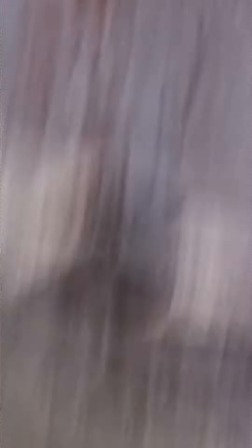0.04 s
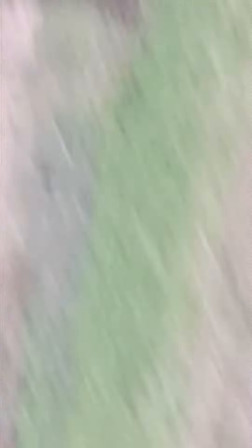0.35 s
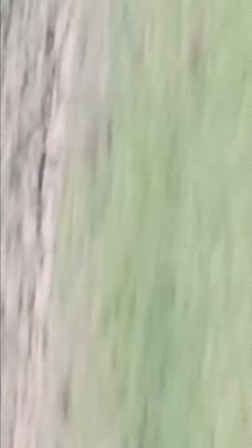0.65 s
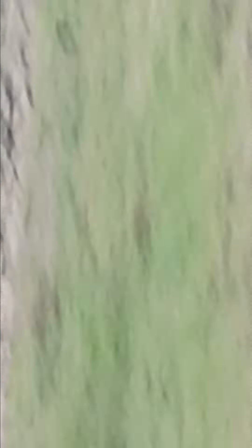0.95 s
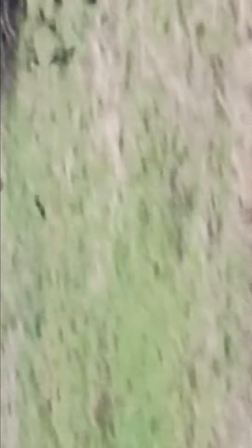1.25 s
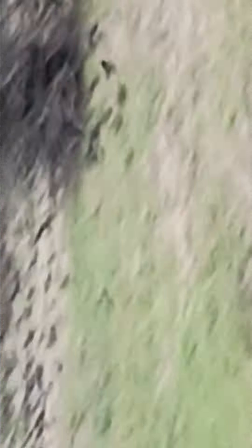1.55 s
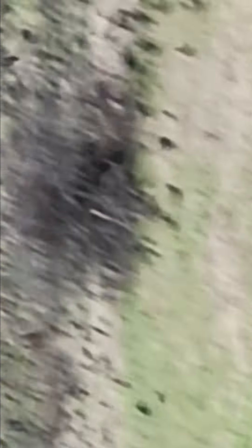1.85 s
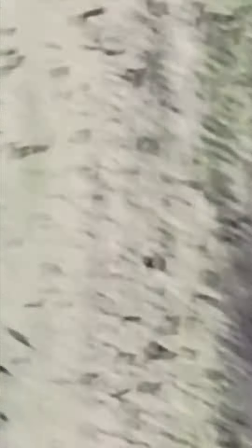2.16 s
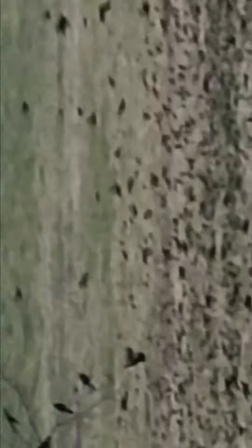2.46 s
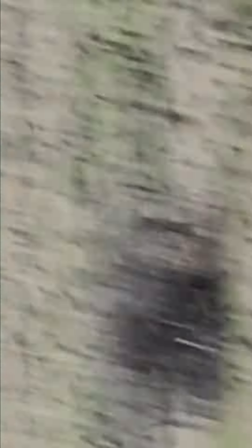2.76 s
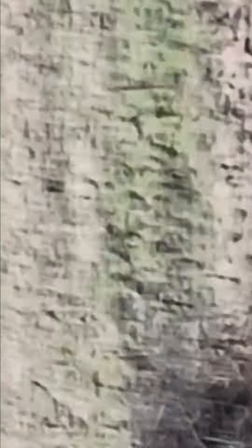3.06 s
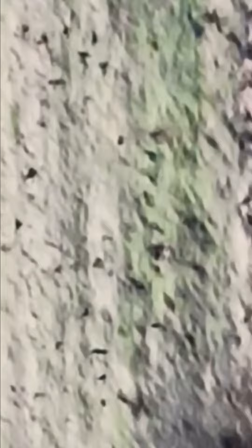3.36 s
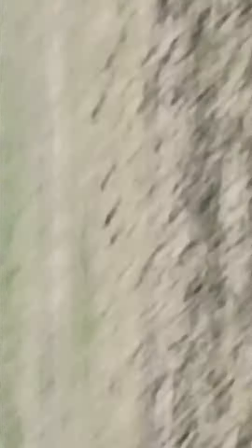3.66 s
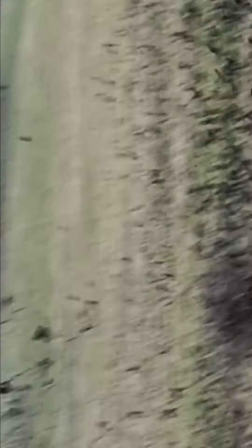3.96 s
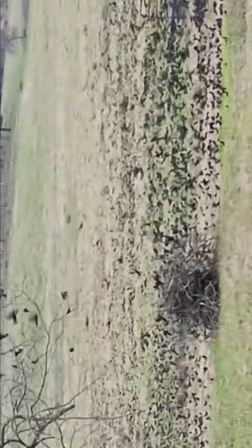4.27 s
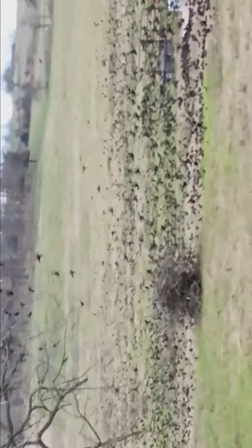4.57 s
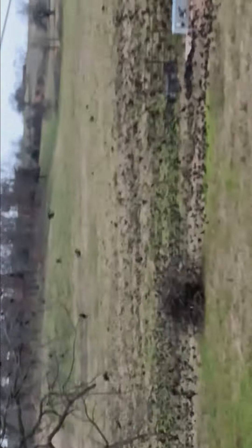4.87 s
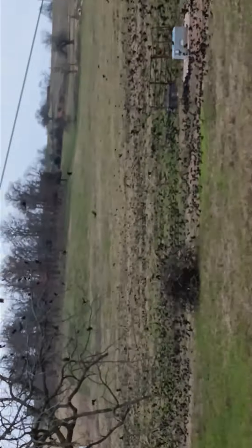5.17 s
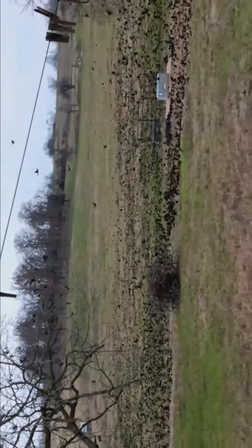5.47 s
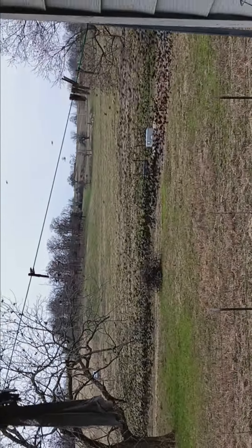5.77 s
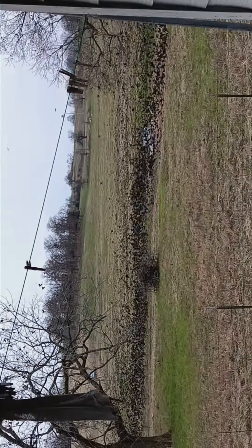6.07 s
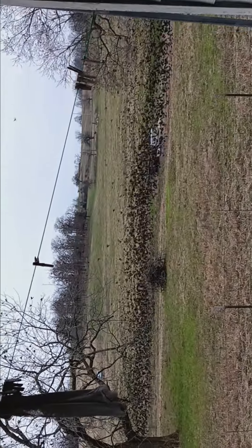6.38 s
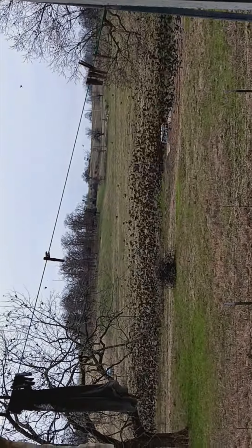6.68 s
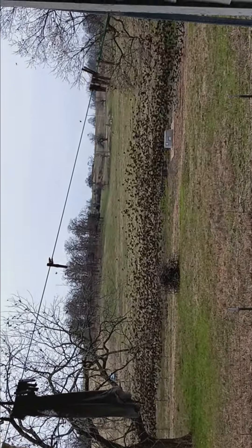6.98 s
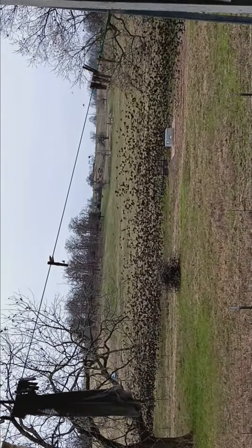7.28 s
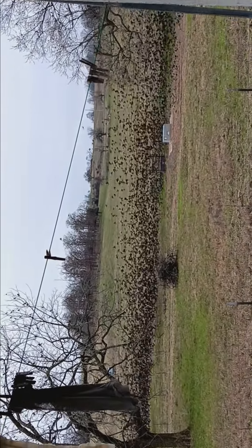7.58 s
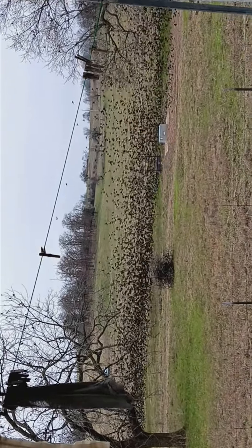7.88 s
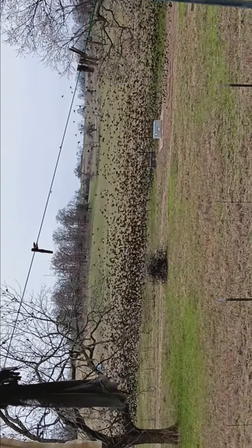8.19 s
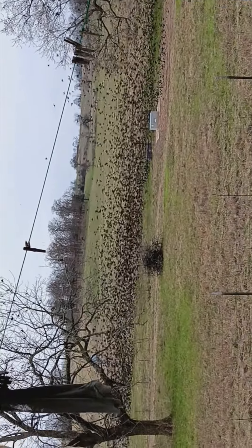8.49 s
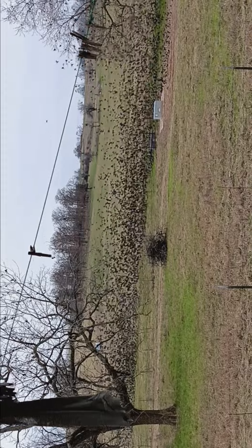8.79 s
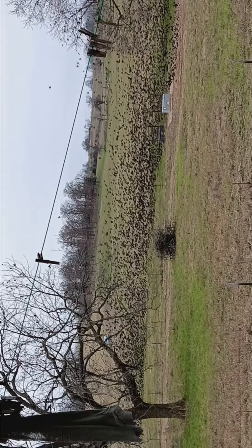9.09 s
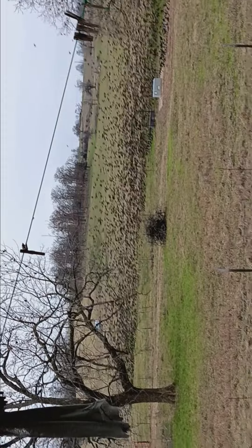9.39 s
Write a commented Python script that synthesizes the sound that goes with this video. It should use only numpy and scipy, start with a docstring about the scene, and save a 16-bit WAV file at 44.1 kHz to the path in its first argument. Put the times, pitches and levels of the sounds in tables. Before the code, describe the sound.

Scraping and soft knocks on a handheld phone over distant blackbird chatter, chacks and whistles, then the fluttering rumble of the flock lifting off.

```python
"""A huge flock of blackbirds feeds on a field beside a house. At first the phone is swung about, and
fingers rub its case by stick-slip friction and knock it into ringing beside the two microphone ports.
Over the distant chatter come thin whistles, dry chacks and screeches, the modulated tones of the syrinx.
Midway the flock lifts off: countless wingbeats sum to a low roar, and the birds call less.
Near the end the flock settles and its chatter returns."""
import sys
import numpy as np
from scipy import signal
from scipy.fft import rfft, irfft, next_fast_len
from scipy.io import wavfile
from scipy.ndimage import uniform_filter1d

SR = 44100
rng = np.random.default_rng(int(sys.argv[2]) if len(sys.argv) > 2 else 0)


def master(y):
    """Save y as 16-bit WAV."""
    cut = np.clip(np.atleast_2d(y).T, -1, 1)
    pcm = np.round(cut * 32767)  # scale
    wavfile.write(sys.argv[1], SR, pcm.astype(np.int16))


N = 420273
TIME = np.arange(N) / SR

# Finger strokes on the case. Each row: start in seconds, length in seconds, relative scrape and hiss
# levels in dB, nearest port (0 left, 1 right), extra treble in dB.
STROKES = [(0, 0.25, -46, -49.5, 0, -2), (0, 0.5, -50, -43, 1, -3), (0.283, 0.089, -66, -40.5, 1, -20),
           (0.46, 0.71, -46, -48.5, 0, -0.5), (0.649, 0.13, -48, -41.5, 1, -5),
           (0.792, 0.28, -50, -51.5, 1, -15), (0.919, 0.099, -40, -41.5, 0, 6),
           (1.975, 0.047, -54, -70, 0, -2), (2.615, 0.19, -39.5, -46, 1, -6), (2.644, 0.14, -57, -36, 0, 8),
           (2.746, 0.15, -40, -48.5, 0, 12), (2.765, 0.24, -54, -50.5, 1, -4),
           (2.984, 0.027, -65, -32.5, 1, -5), (3.057, 0.09, -55.5, -31, 1, 6.5)]
# Groan of dragging skin. Each row: time in seconds, slips per second, level against the scrape in dB.
SKIN_SLIPS = [(0, 218, -8.5), (.95, 300, -6.5), (2.74, 425, -26), (2.765, 213, 2), (2.87, 190, 1),
              (3.1, 460, -4)]
# The hollow under the hand. Each row: time in seconds, resonant frequency in Hz.
HAND_CAVITY = [(0, 790), (1, 564), (2.63, 960), (2.73, 855), (2.9, 480)]
# Resonances between finger and port. Each row: centre in Hz, bandwidth in Hz, level in dB.
GAP_RESONANCES = [(2000, 290, -13.5), (3500, 920, -3.5), (7030, 1330, 8)]
# Spectra of friction. Each row: frequency in Hz, relative level in dB.
SCRAPE_SPECTRUM = [(50, -18.5), (160, -3), (480, -6.5), (1300, -8.5), (2500, -5.5), (5000, -69)]
HISS_SPECTRUM = [(700, -27), (1600, 9), (3500, 9), (8000, 10.5), (10500, 5), (15500, -5.5)]
# Spectra of the open air, far chatter and high twitter. Each row: frequency in Hz, relative level in dB.
AIR_SPECTRUM = [(42, -10), (65, -2), (110, -13), (1000, -22), (3000, -19.5), (8000, -39), (15500, -38.5)]
CHATTER_SPECTRUM = [(600, -48), (1100, -5), (2100, 2), (2900, 3), (3450, 1.5), (4300, -14.5), (9000, -15)]
TWITTER_SPECTRUM = [(3500, -41), (4600, -12), (6500, 0), (8200, -1.5), (9500, -4), (11000, -12.5),
                    (15000, -33)]
# How eagerly the far flock calls. Each row: time in seconds, relative level in dB.
FLOCK_LEVEL = [(1.4, -55), (1.63, -63.5), (1.86, -58.5), (2.84, -54.5), (3.45, -59), (4.3, -64.5),
               (4.55, -71), (4.75, -65.5), (5.3, -68.5), (6, -67), (7.35, -67), (7.71, -60), (8.15, -65),
               (9.05, -57), (9.53, -61)]
# Where the callers lie as the phone turns. Each row: time in seconds, left over right in dB.
CALLER_BEARING = [(.5, -2), (1.2, 4), (2.3, -1.5), (3.3, 10), (4.4, 20), (7.5, 10.5), (8.6, 4.5)]
# Soft knocks. Each row: start in seconds, level in dB, left over right in dB, pitch ratio of the spot.
FINGER_KNOCKS = [(0.033, -35, 3, 0.82), (.335, -27.5, -24.5, 0.76), (.394, -31, 6.5, 0.93),
                 (1.065, -35.5, 12, 1.07), (2.628, -38.5, -26, 2.54), (2.776, -32.5, 3, 1.05),
                 (3.461, -38.5, 12, 0.924), (4.83, -49, 9, 1.7), (8.256, -59, -14, 1.57)]
# Modes of the case. Each row: frequency in Hz, level in dB, time to decay by 60 dB in seconds.
CASE_MODES = [(124, -7.5, 0.087), (214, 3, 0.045), (342, 2.5, 0.036), (510, 4.5, 0.016),
              (1067, -10.5, 0.051)]
# Slips of a nail. Each row: start in seconds, level in dB, left over right in dB.
NAIL_TICKS = [(.17, -39.5, -10), (.66, -36.5, -19), (.678, -38, -18), (2.731, -39, -7), (3.135, -33, -12),
              (3.407, -48.5, 5), (4.655, -50, 22), (8.264, -55.5, -18)]
# Whistles. Each row: start in seconds, length in seconds, first and last pitch in Hz, level in dB,
# roughness from 0 to 1, arch as a share of the pitch.
WHISTLE_NOTES = [(0.392, 0.088, 6000, 6490, -41, 0.17, 0.022),
                 (1.368, 0.051, 10900, 10200, -55, .26, 0.0059),
                 (2.404, 0.12, 8300, 8750, -47.5, 0.88, -0.0089),
                 (3.157, .135, 4360, 5800, -49, 0.43, -0.024),
                 (3.218, 0.063, 5740, 6370, -45, 0.44, -0.0015),
                 (3.571, 0.038, 3360, 3320, -59.5, .03, 0.0064), (3.8, 0.53, 6740, 6380, -69, .12, 0.052),
                 (4.28, .125, 5360, 5560, -60.5, 0.12, -0.033),
                 (4.309, 0.024, 7300, 8100, -53.5, 0.06, 0.017), (8.868, 0.59, 4910, 4950, -73, 0.54, 0.15),
                 (9.063, 0.28, 4170, 3780, -62, 0.75, 0)]
# The nearest chacks. Each row: start in seconds, nominal length in seconds, level in dB.
NEAR_CHACKS = [(0.496, 0.12, -41.5), (1.059, 0.053, -46), (1.26, 0.15, -51.5), (1.709, 0.046, -52),
               (1.774, 0.075, -49), (1.913, 0.048, -50), (1.972, 0.046, -48), (2.151, 0.039, -60),
               (2.256, 0.029, -45), (2.314, 0.031, -48), (2.867, 0.16, -46.5), (3.129, .082, -49.5),
               (3.25, 0.041, -43), (3.302, 0.051, -47), (3.378, 0.031, -44.5), (3.757, .058, -51),
               (4.016, 0.019, -59), (4.178, 0.034, -53), (4.373, 0.033, -49), (4.438, 0.027, -46),
               (4.637, .1, -55.5), (5.095, 0.018, -59.5), (5.15, 0.024, -54.5), (5.437, .018, -53),
               (5.512, 0.016, -53), (5.738, 0.035, -61.5), (5.79, 0.027, -56), (6.863, .018, -60.5),
               (7.084, 0.04, -57), (7.138, 0.062, -60), (7.225, 0.051, -53), (7.415, 0.057, -56),
               (7.485, 0.049, -50.5), (7.674, 0.047, -49), (7.843, 0.053, -55), (7.921, 0.07, -54),
               (8.062, 0.03, -56.5), (8.188, 0.044, -50), (8.298, 0.094, -55.5), (8.467, 0.028, -49.5),
               (8.5, 0.082, -51.5), (8.595, 0.046, -50.5), (8.752, 0.029, -49.5), (8.798, 0.083, -51),
               (9.273, 0.055, -53)]
# Partials of a chack. Each row: ratio to the centre frequency, level in dB.
CHACK_CLUSTER = [(.84, -4.5), (1, -0.5), (1.14, -4)]
# Throat of a chacking bird. Each row: nominal distance from the centre in octaves, gain in dB.
THROAT_RESPONSE = [(-1.97, -24.5), (-0.56, -5), (-0.68, -1.5), (-0.57, 4), (0.36, 1), (0.7, -28)]
# Screeches. Each row: nominal start and length in seconds, centre in Hz, level in dB.
SCREECH_NOTES = [(1.776, 0.068, 8100, -56.5), (3.141, .17, 6350, -54), (3.845, 0.13, 5700, -59),
                 (4.185, .15, 5450, -58), (4.377, 0.064, 7060, -60.5), (4.626, .23, 6090, -62),
                 (8.917, 0.52, 5200, -66), (9.072, 0.062, 7170, -57.5)]
# Early flushes, then the whole flock rises and settles. Each row: time in seconds, roar level in dB.
WING_LEVEL = [(3.5, -60), (4.45, -79), (4.88, -53.5), (5.12, -67.5), (5.28, -60.5), (5.42, -68),
              (5.8, -51.5), (6.5, -49.5), (7.03, -50.5), (7.35, -62), (8.4, -74)]
# Spectra of wingbeats and feathers. Each row: frequency in Hz, relative level in dB.
ROAR_SPECTRUM = [(25, -33), (45, 6), (75, 0.5), (150, -11), (260, -16), (420, -52), (800, -40.5)]
FEATHER_SPECTRUM = [(300, -15), (900, -5.5), (2500, -9.5), (8000, -15), (15500, -34.5)]
# Responses of the microphone ports. Each row: frequency in Hz, gain in dB.
LEFT_RESPONSE = [(20, 3), (2200, 0), (3500, 5), (8000, 1.5), (9000, -6), (10000, -10.5), (15000, 3)]
RIGHT_RESPONSE = [(20, 1.5), (2200, 2.5), (4200, 1.5), (6000, -2.5), (9000, 2.5), (15000, 3.5)]

PORT_LAG_SAMPLES, CUTOFF_HZ = 43, 15800


def from_db(db):
    """Amplitude ratio of a level in dB."""
    return np.exp(np.asarray(db) * (np.log(10) / 20))


def rms_one(x):
    """Scale a signal to unit mean power."""
    return x / np.sqrt(np.mean(x ** 2) + 1e-20)


def in_time(rows):
    """Linear interpolation of each column of a curve at every sample."""
    s, *columns = np.transpose(rows)
    return [np.interp(TIME, s, c) for c in columns]


def coloured(x, points):
    """Spectral shaping by a (Hz, dB) curve that falls 20 dB an octave beyond its ends."""
    size = next_fast_len(x.shape[-1], real=True)
    hz, db = np.transpose(points)
    octave, known = np.log2(np.fft.rfftfreq(size, 1 / SR) + 1), np.log2(hz)
    beyond = np.abs(octave - np.clip(octave, known[0], known[-1]))
    gain = from_db(np.interp(octave, known, db) - 20 * beyond)
    return irfft(rfft(x, size) * gain, size)[..., :x.shape[-1]]


def drift(rate_hz, size):
    """Random modulation: straight lines between Gaussian values, with a spread near 1."""
    knots = rng.standard_normal(int(size * rate_hz / SR) + 2)
    return np.interp(np.arange(size) * rate_hz / SR, np.arange(len(knots)), knots)


def swell(size, rise, fall):
    """A plateau envelope with rounded ends; rise and fall are shares of its length."""
    u = np.linspace(0, 1, size)
    return np.sin(np.pi / 2 * np.clip(np.minimum(u / rise, (1 - u) / fall), 0, 1)) ** 2


def panned(pan_db):
    """Direction as a level difference: left and right gains of mean power 1."""
    gains = from_db(np.array([[.5], [-.5]]) * pan_db)
    return gains / np.sqrt(np.mean(gains ** 2, axis=0))


def add(out, s, sound):
    """Superpose a sound on the mix at s seconds."""
    start = int(np.clip(s * SR, 0, N - 1))
    out[..., start:start + sound.shape[-1]] += sound[..., :N - start]


def tone(hz):
    """A sinusoid whose phase is the integral of its frequency."""
    return np.sin(2 * np.pi * np.cumsum(hz) / SR)


def resonance(x, hz, width_hz):
    """Forced response of a damped resonator whose centre moves; rms 1."""
    turn = np.exp(2j * np.pi * np.cumsum(hz) / SR)
    pole = np.exp(-np.pi * width_hz / SR)
    return rms_one((turn * signal.lfilter([1], [1, -pole], x / turn)).real)


def crackle(size, smooth, snaps_per_s=830, spread_db=5):
    """Shot noise: skin ridges snap free in random clumps over a smooth friction noise; rms 1."""
    snaps = rng.random((2, size)) < snaps_per_s / SR * from_db(5 * drift(45, size))
    strengths = from_db(spread_db * np.minimum(rng.exponential(1, (2, size)), 2))
    signs = rng.choice([-1, 1], (2, size))
    return rms_one(rms_one(snaps * strengths * signs) + smooth * rng.standard_normal((2, size)))


def rubs():
    """Stick-slip friction of skin drives cavity resonances: a groaning scrape and a crackling hiss."""
    out, held = np.zeros((2, N)), int(3.3 * SR)
    slip_hz, groan_db, cavity_hz = (c[:held] for c in in_time(SKIN_SLIPS) + in_time(HAND_CAVITY))
    groan_hz = slip_hz * (1 + 0.1682 * drift(250, held))
    groan = sum(tone(k * groan_hz) / k for k in range(1, 4)) * from_db(groan_db + 3.5 * drift(110, held))
    friction, grains = crackle(held, smooth=0.6), crackle(held, smooth=1.33)
    hollow = resonance(friction, cavity_hz * 2 ** (0.15 * drift(35, held)), width_hz=36)
    scrape = rms_one(coloured(friction, SCRAPE_SPECTRUM)) + 0.27 * hollow + groan
    scrape *= from_db(2 * drift(39.82, held))
    ringing = np.zeros((2, held))
    for hz, width_hz, db in GAP_RESONANCES:
        gain = from_db(db + 2.2 * drift(25, held))
        ringing += gain * resonance(grains, hz * 2 ** (0.49 * drift(20, held)), width_hz)
    hiss = coloured(grains + rms_one(ringing), HISS_SPECTRUM) * from_db(1.9 * drift(55, held))
    for s, length, scrape_db, hiss_db, port, treble_db in STROKES:
        start, size = int(s * SR), int(length * SR)
        span, side = slice(start, start + size), 1 if port == 0 else -1
        shelf = [(20, 0), (7000, 0), (11500, treble_db), (CUTOFF_HZ, treble_db)]
        low = from_db(scrape_db - 6.5) * panned(8 * side) * rms_one(scrape[:, span])
        high = from_db(hiss_db - 3) * panned(24 * side) * rms_one(coloured(hiss[:, span], shelf))
        add(out, s, (low + high) * swell(size, rise=0.11, fall=0.36))
    return out


def field_noise(spectrum, coherence):
    """Partly coherent noise from the field: its shared part reaches the right port first."""
    wave = rng.standard_normal(N)
    shared = np.sqrt(coherence) * np.array([np.roll(wave, PORT_LAG_SAMPLES), wave])
    diffuse = np.sqrt(1 - coherence) * rng.standard_normal((2, N))
    return rms_one(coloured((shared + diffuse).astype(np.float32), spectrum))


def rasp(size, hz, pulse_hz, wobble, depth_db):
    """Random frequency and amplitude modulation make a gliding syrinx tone harsh."""
    glide = 1 + .035 * rng.normal() * np.linspace(-1, 1, size)
    note = tone(hz * glide * (1 + wobble * drift(1500, size)))
    return rms_one(note * from_db(depth_db * drift(pulse_hz, size)))


def crowd(low_hz, high_hz, wobble, spread_db, count):
    """Incoherent sum of short far calls at random times, pitches, distances and sides; rms 1."""
    out = np.zeros((2, N))
    for when, pitch, length, near, side in rng.random((count, 5)):
        size = int((0.0234 + 0.074 * length) * SR)
        hz = low_hz * (high_hz / low_hz) ** pitch
        call = rasp(size, hz, pulse_hz=245, wobble=wobble * rng.uniform(0.22, 1), depth_db=3)
        call *= swell(size, rise=0.15, fall=0.57)
        add(out, when * N / SR, from_db(spread_db * near ** 2) * panned(8 * (side - .5)) * call)
    return rms_one(out)


def far_flock():
    """Returns separate far calls and the wash of noise into which the farthest overlap."""
    (flock_db,), (bearing_db,) = in_time(FLOCK_LEVEL), in_time(CALLER_BEARING)
    chatter_gain = from_db(1.5 + flock_db) * panned(2 + bearing_db)
    twitter_gain = from_db(-68.5 + 0.47 * (flock_db - flock_db.mean())) * panned(0.1)
    chatter = crowd(2150, 3700, wobble=0.1393, spread_db=1.5, count=450)
    twitter = crowd(4500, 10000, wobble=0.05, spread_db=8.5, count=500)
    calls = chatter_gain * rms_one(coloured(chatter, CHATTER_SPECTRUM))
    calls += twitter_gain * rms_one(coloured(twitter, TWITTER_SPECTRUM))
    calls *= from_db(1 + 0.26 * (flock_db - flock_db.max()))   # in a lull, voices sink into the wash
    wash = chatter_gain * field_noise(CHATTER_SPECTRUM, coherence=0.064)
    wash += twitter_gain * field_noise(TWITTER_SPECTRUM, coherence=0.077)
    return calls, from_db(-7) * wash


def yard(x, early_t60, scatter_db, late_t60=0.98):
    """Multipath propagation: ground, wall and trees return echoes that differ at each port."""
    t = np.arange(int(.4 * SR)) / SR
    early = rng.standard_normal((2, len(t))) * (rng.random((2, len(t))) < .03)
    early *= from_db(-60 * t / early_t60)
    late = rng.standard_normal((2, len(t))) * from_db(-60 * t / late_t60)
    echoes = from_db(scatter_db) * (rms_one(early) + from_db(-14) * rms_one(late)) / np.sqrt(len(t))
    echoes[[0, 1], [PORT_LAG_SAMPLES, 0]] += 1   # the direct path
    # callers are spread over the whole field, so the echoes favour no broad band
    paths = rfft(echoes)
    paths /= np.sqrt(uniform_filter1d(np.abs(paths) ** 2, size=80, axis=1))
    lead = SR // 100
    response = np.roll(irfft(paths, len(t)), lead, axis=1)
    return signal.oaconvolve(x, response, axes=1)[:, lead:lead + N]


def knocks(contact_s=0.0074):
    """Impact excites the damped modes of the case; a soft fingertip sets them ringing gradually."""
    out, t = np.zeros((2, N)), np.arange(SR // 10) / SR
    for s, db, pan_db, ratio in FINGER_KNOCKS:
        thump = np.zeros(len(t))
        for hz, mode_db, t60 in CASE_MODES:
            decay = from_db(mode_db + 2 * rng.normal() - 60 * t / t60)
            thump += decay * np.sin(2 * np.pi * hz * ratio * (1 + 0.12 * rng.normal()) * t)
        onset = 1 - np.exp(-t * ratio / contact_s)
        add(out, s, from_db(db) * panned(pan_db) * thump * onset)
    return out


def nail_ticks():
    """A nail slipping for a few milliseconds gives a bright burst of friction noise."""
    out, size = np.zeros((2, N)), int(0.0039 * SR)
    for s, db, pan_db in NAIL_TICKS:
        scratch = rms_one(coloured(rng.standard_normal((2, size)), HISS_SPECTRUM))
        add(out, s, from_db(db) * panned(pan_db) * scratch * swell(size, rise=0.063, fall=0.39))
    return out


def whistles():
    """Single tones glide in a slight arch; fast modulation makes forced ones warble and break up."""
    out = np.zeros(N)
    for s, length, start_hz, end_hz, db, rough, arch in WHISTLE_NOTES:
        size = int(length * SR)
        hz = np.linspace(start_hz, end_hz, size) * (1 + arch * np.sin(np.linspace(0, np.pi, size)))
        warble = 1 + rough * (.055 * drift(1100, size) + .018 * drift(110, size))
        note = tone(hz * warble) * from_db(3.4 * drift(87.3, size) + 5.6 * rough * drift(300, size))
        add(out, s, from_db(db) * rms_one(note * swell(size, rise=0.16, fall=0.085)))
    return out


def ground_echo(x):
    """Comb filtering: a bounce off the ground interferes with the direct sound."""
    return x + .8 * np.roll(x, int(rng.uniform(.0008, .0022) * SR))


def chack(length, upper_db, centre_hz=2766, attack_s=0.0074):
    """Source and filter: the throat shapes pulsed partials and breath, under a weaker band near 7 kHz."""
    hz = centre_hz * (1 + 0.0355 * rng.normal())
    size = int(length * 1.5 * SR)
    pulses = from_db(3.8 * np.tanh(drift(448, size)) + 1.15 * drift(46.4, size))
    cluster = np.zeros(size)
    for ratio, db in CHACK_CLUSTER:
        partial_hz = hz * ratio * (1 + .05 * rng.normal())
        cluster += from_db(db) * rasp(size, partial_hz, pulse_hz=116.4, wobble=0.054, depth_db=4.5)
    breadth = (size / SR / 0.064) ** 0.23   # longer chacks are broader in spectrum
    throat = [(hz * 2 ** (octaves * breadth), db) for octaves, db in THROAT_RESPONSE]
    low = rms_one(coloured(pulses * (rms_one(cluster) + 2.2 * rng.standard_normal(size)), throat))
    slide_octaves = 0.22 * rng.normal() * np.linspace(-.5, .5, size)
    core = resonance(pulses * low, hz * 2 ** slide_octaves, width_hz=600)
    low = rms_one(low + from_db(-7.5) * min(1, 0.038 / length) ** 2 * core)   # long chacks hardly ring
    upper = rasp(size, 6900 * (1 + 0.077 * rng.normal()), pulse_hz=284, wobble=0.047, depth_db=5.5)
    high = coloured(pulses * (upper + 2 * rng.standard_normal(size)), TWITTER_SPECTRUM)
    call = low + from_db(upper_db) * rms_one(ground_echo(high))
    return call * swell(size, rise=min(attack_s * SR / size, .5), fall=0.47)


def lesser_chacks(per_s=3, mean_length_s=0.0298, over_flock_db=3, spread_db=2.5):
    """A random process of calls whose level follows the flock; rows as in NEAR_CHACKS."""
    when, length, near = rng.random((int(per_s * N / SR), 3)).T
    s = when * N / SR
    db = np.interp(s, *np.transpose(FLOCK_LEVEL)) + over_flock_db + spread_db * (2 * near - 1)
    return list(zip(s, mean_length_s * (.5 + length), db))


def chacks():
    """The level difference between the ports shifts from chack to chack as the phone turns."""
    out = np.zeros((2, N))
    for s, length, db in NEAR_CHACKS + lesser_chacks():
        call = chack(length, upper_db=np.interp(s, [3.3, 5], [-11, -18]))
        bearing_db = np.interp(s, *np.transpose(CALLER_BEARING))
        add(out, s, from_db(db) * panned(bearing_db) * call)
    return out


def screeches():
    """Roughness: six clashing, inharmonic high partials buzz together like a rusty hinge."""
    out = np.zeros(N)
    for s, length, hz, db in SCREECH_NOTES:
        size = int(length * 1.33 * SR)
        partials = sum(rasp(size, hz * ratio, pulse_hz=60.4, wobble=0.0406, depth_db=8)
                       for ratio in np.geomspace(.8, 1.27, 6))
        add(out, s - 0.2 * length, from_db(db) * rms_one(partials * swell(size, rise=0.29, fall=0.33)))
    return out


def wings():
    """Thousands of wingbeats in random phase merge into a fluttering roar, with a swish of feathers."""
    roar_db, = in_time(WING_LEVEL)
    airborne = np.interp(TIME, [3.2, 3.6, 8.2, 8.7], [0, 1, 1, 0])
    roar = field_noise(ROAR_SPECTRUM, coherence=0.94) * from_db(4.3 * drift(22, N))
    swish = field_noise(FEATHER_SPECTRUM, coherence=0.074) * from_db(-16.5 + 1.5 * drift(60, N))
    return airborne * from_db(roar_db) * (roar + swish)


def scene():
    """Superposition of the quiet open air, the flock with its echoes and the hand on the phone."""
    air = from_db(-69.5) * field_noise(AIR_SPECTRUM, coherence=0.77)
    far_calls, wash = far_flock()
    calls = yard(far_calls + chacks() + screeches() * panned(0.46), early_t60=0.027, scatter_db=2)
    whistling = yard(whistles() * panned(1.8), early_t60=0.053, scatter_db=-6)
    return air + wash + calls + whistling + wings() + rubs() + knocks() + nail_ticks()


def record(dry):
    """Each port has its own frequency response; a steep low-pass filter cuts the top."""
    ports = np.array([coloured(dry[0], LEFT_RESPONSE), coloured(dry[1], RIGHT_RESPONSE)])
    return signal.sosfilt(signal.ellip(10, .2, 70, CUTOFF_HZ, fs=SR, output="sos"), ports)


dry = scene()
out = record(dry)
master(out)
```